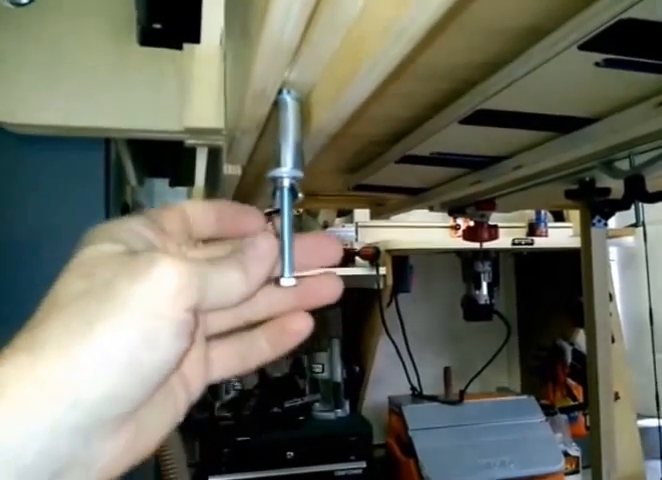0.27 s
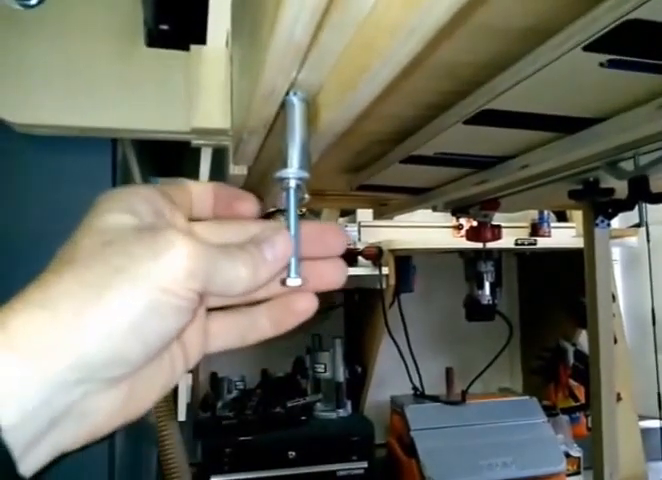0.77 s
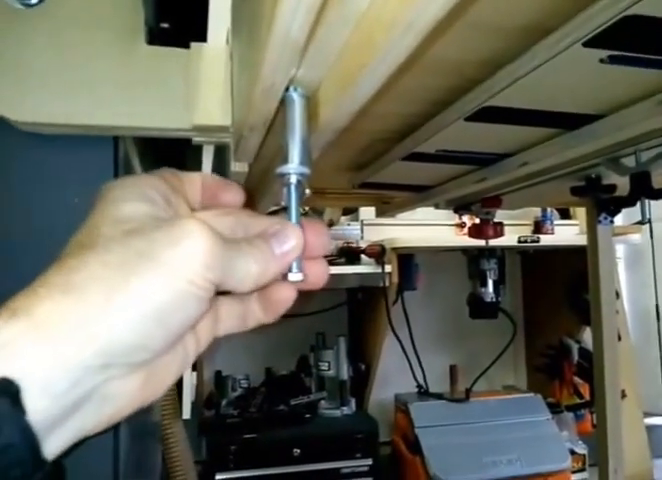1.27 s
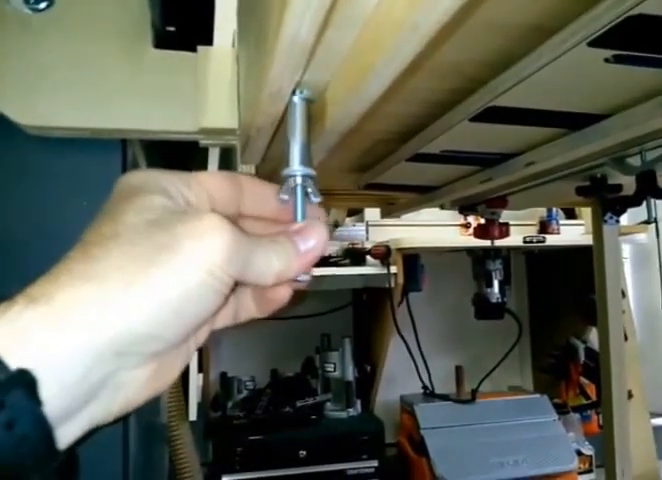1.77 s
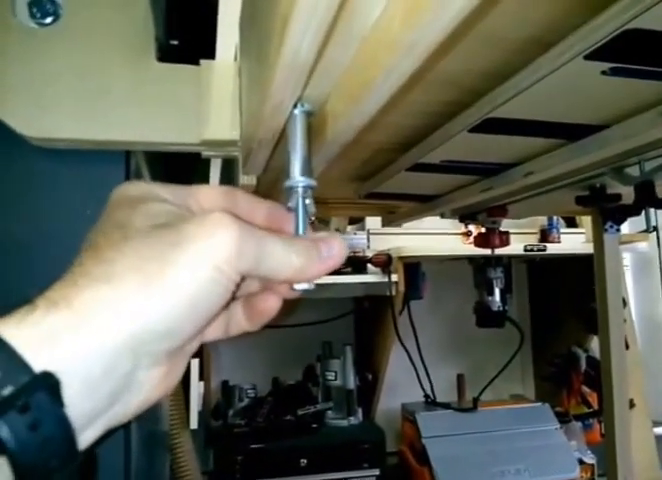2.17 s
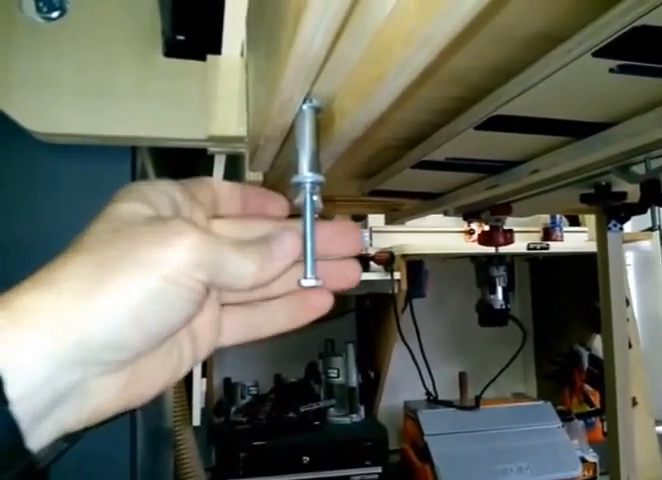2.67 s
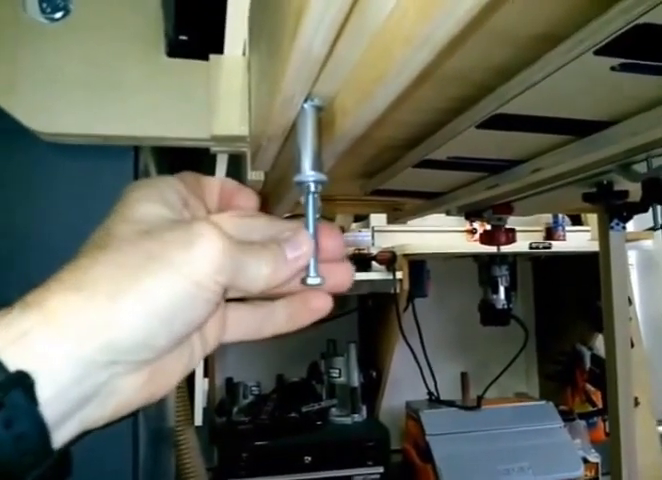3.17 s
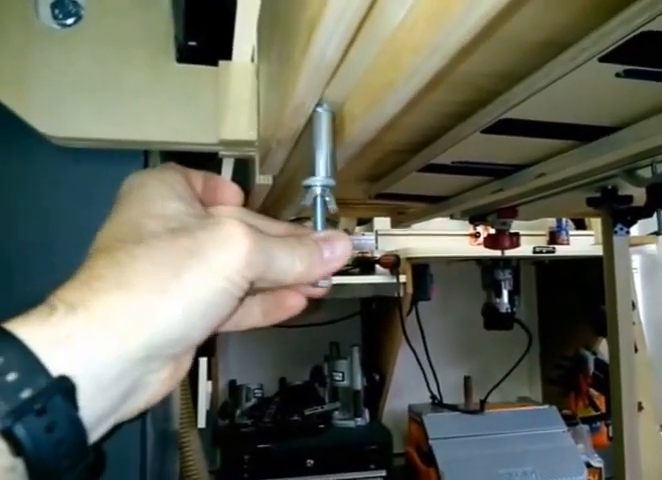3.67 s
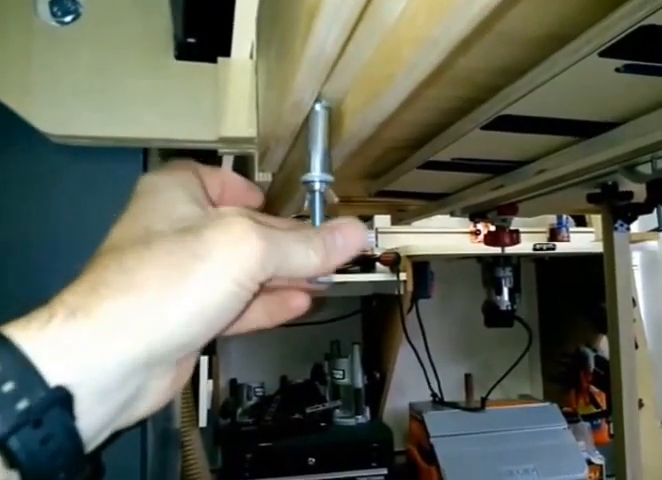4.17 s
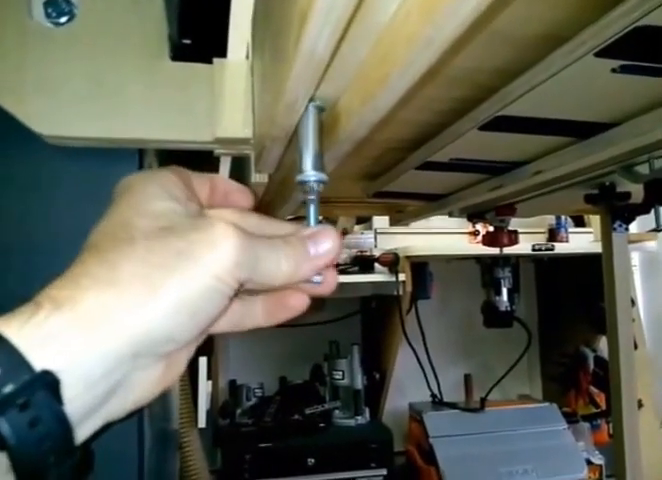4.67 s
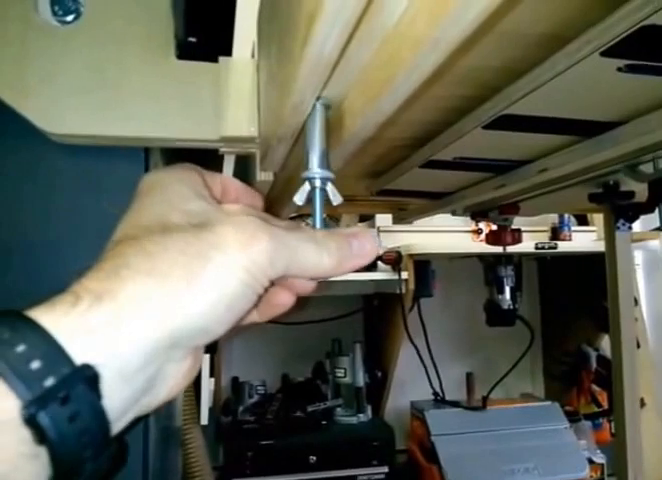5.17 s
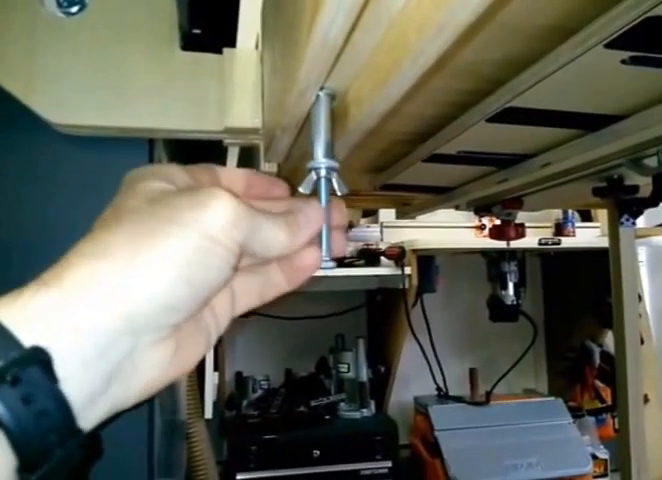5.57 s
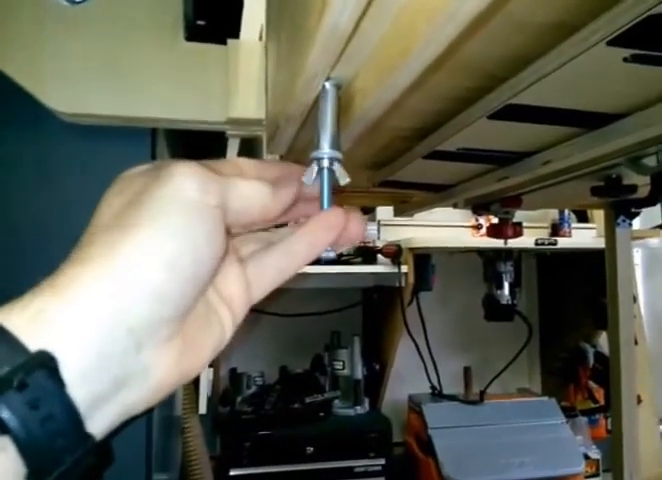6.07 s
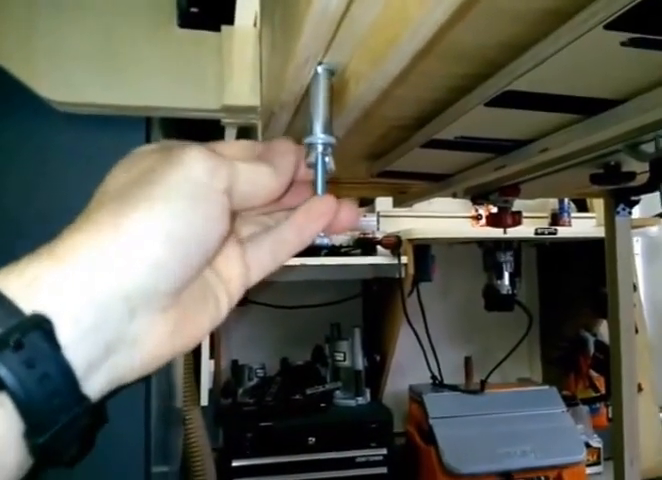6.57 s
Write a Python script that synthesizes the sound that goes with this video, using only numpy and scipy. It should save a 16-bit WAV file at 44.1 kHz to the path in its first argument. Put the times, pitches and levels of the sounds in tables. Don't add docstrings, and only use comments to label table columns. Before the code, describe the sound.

In a humming, rumbling workshop, a fingernail snaps once on a bolt head. After a pause, a hand turns a wing nut in short strokes: gritty thread scrapes, wooden knocks, bright ticks and one tiny squeal. Later strokes are sparser, with soft finger bumps and two sharp clinks. Close phone pickup; a noise gate makes the hum drop out and return.

```python
import sys
import numpy as np
from scipy import signal
from scipy.fft import rfft, irfft
from scipy.io import wavfile
from scipy.ndimage import uniform_filter1d

SR = 44100
rng = np.random.default_rng(int(sys.argv[2]) if len(sys.argv) > 2 else 0)


def field_ratio(decibels):
    return 10 ** (np.asarray(decibels, dtype=float) / 20)


def inscribe(sig):
    pcm = np.round(np.clip(np.atleast_2d(sig).T, -1, 1) * 32767)
    wavfile.write(sys.argv[1], SR, pcm.astype(np.int16))


N = 300321

GATE_OPEN_DB = -68.5
FIRST_TURN_S = 1.43
UPPER_WOOD_HZ = 1350
MODE_SCATTER_DB = 2


def unit(x):
    return x / np.sqrt(np.mean(x ** 2))


def ring(x, hz, width):
    return signal.lfilter(*signal.iirpeak(hz, hz / width, fs=SR), x)


def decay(t, t60):
    return np.exp(-np.log(1000) * t / t60)


def lowpass(x, order, hz):
    return signal.lfilter(*signal.butter(order, hz, fs=SR), x)


def curve(rows):
    s, *columns = np.transpose(rows)
    return [np.interp(np.arange(N) / SR, s, c) for c in columns]


def wander(rate_hz):
    return unit(ring(rng.standard_normal(N), rate_hz, 2.6 * rate_hz))


def above(db, quiet_db):
    return np.sqrt(np.maximum(field_ratio(db) ** 2 - field_ratio(quiet_db) ** 2, 0))


def grit(per_s, spread_db, most=2):
    hit = rng.random(N) < per_s / SR
    size_db = spread_db * np.minimum(rng.exponential(size=N), most)
    return unit(hit * rng.standard_normal(N) * field_ratio(size_db))


def add(out, s, burst, db):
    i = int(s * SR)
    out[i:i + len(burst)] += (field_ratio(db) * burst / np.abs(burst).max())[:N - i]


# frequency in Hz, level in dB per Hz.
AIR = [(35, -29.5), (60, -2), (149, -4.5), (202, -7), (249, -14.5), (280, -12), (563, -22), (604, -8),
       (647, -23), (1130, -24.5), (8030, -33.5), (9460, -31.5), (15800, -30)]
# pitch in Hz, rms level in dB.
HUM = [(119.7, -59.5), (143.3, -56), (172, -62), (239.5, -65), (476, -73), (598.5, -71)]
# centre in Hz, width in Hz, rms level in dB.
HISS = [(5500, 1400, -70), (7200, 200, -76.5), (9410, 190, -73.5)]
# pitch in Hz, rms level in dB.
WHINE = [(9493, -86), (9628, -76), (9767, -84), (9906, -86)]
# time in seconds, level in dB over the open gate level.
RUMBLE = [(0, 17.5), (1.3, 19.5), (1.8, 16), (2.5, 13), (3.2, 16), (4.2, 11.5), (5.1, 14), (5.6, 7),
          (6.81, 8.5)]


def shop():
    hz = np.fft.rfftfreq(N, 1 / SR) + 1
    at, db = np.transpose(AIR)
    colour = field_ratio(np.interp(np.log(hz), np.log(at), db))
    air = unit(irfft(rfft(rng.standard_normal(N)) * colour, N))
    t = np.arange(N) / SR
    lines = [(f, 3.6 + 0.0051 * f, g) for f, g in HUM]
    machines = sum(field_ratio(g) * unit(ring(rng.standard_normal(N), f, w)) for f, w, g in lines + list(HISS))
    machines = machines + sum(field_ratio(g) * np.sqrt(2) * np.sin(2 * np.pi * f * t) for f, g in WHINE)
    rumble_hz, width_hz = 38.3, 16
    deep = unit(ring(ring(rng.standard_normal(N), rumble_hz, width_hz), rumble_hz, 2 * width_hz))
    deep = deep + 0.99 * np.sin(2 * np.pi * 37.7 * t)
    rumble_db, = curve(RUMBLE)
    return field_ratio(-55) * air + machines + field_ratio(rumble_db + GATE_OPEN_DB) * unit(deep)


# start in seconds, hold in seconds,
# thread force in dB, shift of the bolt in the wood in dB, both over the open gate level.
STROKES = [(0.0, 0.021, 0.5, 16.5), (1.451, 0.008, 24, 20.5), (1.518, 0.027, 7, 11),
           (1.698, 0.012, 26.5, 34), (1.801, .008, 19, 18), (1.815, 0.0075, 29, 37),
           (1.859, 0.07, 13.5, 25.5), (1.974, 0.09, 19.5, 23.5), (2.11, 0.056, 12.5, 20),
           (2.46, 0.0079, -6, 13.5), (2.586, 0.013, 13, -5), (2.782, 0.0094, 27, 27.5),
           (2.8, 0.047, 16.5, 16), (3, 0.027, 12.5, 2), (3.13, .008, 16, 13), (3.323, 0.049, 16, 19),
           (3.66, 0.021, 23, 25.5), (3.953, 0.013, 16, 20.5), (4.101, 0.018, 16.5, 24),
           (4.148, 0.05, 12, 19.5), (4.6, 0.54, 7.5, 11), (4.615, 0.032, 14.5, 20.5), (4.81, 0.11, 10, 9.5),
           (4.994, 0.09, 10, 13), (5.028, 0.03, 9, 11), (5.17, 0.12, 5, 12), (5.574, 0.024, 14, 17),
           (5.863, 0.045, 12.5, 20.5), (5.912, 0.022, 5, 19), (6.013, 0.02, 11.5, -8),
           (6.186, 0.016, 5, 16.5), (6.212, 0.086, 10, 14), (6.323, 0.02, 9, 2), (6.763, .06, 9, 18.5)]


def hand(column, fall_db_s, rest_db):
    t = np.arange(N) / SR
    rise_db_s = 1500
    power = field_ratio(rest_db) ** 2 * (t > FIRST_TURN_S) + 1e-9
    for row in STROKES:
        late = t - row[0]
        rise = rise_db_s * np.minimum(late, 0)
        fall = fall_db_s * np.maximum(late - row[1], 0)
        power = power + field_ratio(row[column] + rise - fall) ** 2
    return 10 * np.log10(power)


EDGE_MODE_HZ, EDGE_MODE_T60_S = 2330, .045
# pitch in Hz, level in dB, 60 dB decay in seconds.
TOP_MODES = [(2900, -13, .07), (3010, -12, .07)]
# pitch in Hz, level in dB, 60 dB decay in seconds.
SHELF = [(484, 8, 0.16), (591, 13.2, 0.06), (610, 1, 0.039), (720, 3.1, 0.1), (770, 8.6, 0.12),
         (835, 7.8, 0.18), (1011, 7.3, 0.14), (1150, 7.3, 0.15), (1580, -7, 0.028), (1727, 0, 0.039),
         (1990, 0, 0.071), (EDGE_MODE_HZ, -3, EDGE_MODE_T60_S), *TOP_MODES]


def rub():
    x = lowpass(grit(1800, 1.2), 2, 2800)
    body = field_ratio(-7) * ring(x, 740, 2000)
    for hz, db, t60 in SHELF:
        mode_db = db + 3 * (hz > UPPER_WOOD_HZ) + 4.7 * wander(8.1)
        body = body + field_ratio(mode_db) * ring(x, hz, 5.3 / t60)
    level_db = hand(column=3, fall_db_s=210, rest_db=10)
    return above(level_db, 7.5) * field_ratio(-5.5) * unit(body)


# time in seconds, peak level in dB.
SNAPS = [
    (0.419, -24),
    (0.421, -35),
]
# pitch in Hz, width in Hz, level in dB.
SNAP_RINGS = [(1100, 240, 7.5), (1540, 160, 1), (2600, 250, -5), (3030, 290, -7), (3660, 640, -3),
              (5200, 1400, 3)]


def snaps():
    out, push = np.zeros(N), signal.unit_impulse(400)
    burst = sum(field_ratio(g) * ring(push, f, w) * f / w for f, w, g in SNAP_RINGS)
    for s, peak_db in SNAPS:
        add(out, s, burst, peak_db)
    return lowpass(out, 6, 6700)


# time in seconds, peak level in dB,
# strongest mode in Hz, chatter length in seconds.
SOFT_KNOCKS = [(1.378, -48, 600, 0.0057), (1.454, -43.5, 1036, 0.035), (1.989, -38.5, 766, 0.084),
               (2.152, -36, 720, 0.003), (2.468, -38, 660, 0.0068), (3.173, -41.5, 704, 0.0037),
               (3.677, -39.5, 990, 0.038), (3.984, -48.5, 613, 0.024), (4.028, -41.5, 610, 0.016),
               (4.108, -40, 710, 0.013), (4.216, -42.5, 600, 0.0097), (4.935, -52, 476, 0.007),
               (5.866, -48, 610, 0.017)]
# time in seconds, peak level in dB,
# strongest mode in Hz, chatter length in seconds.
HARD_KNOCKS = [(1.69, -31, 717, 0.01), (1.696, -34.5, 1980, 0.0027), (1.813, -50, 1150, 0.006),
               (1.824, -26, 770, 0.0036), (1.829, -26.5, 2350, 0.0046), (1.8355, -23.5, 1150, 0.0019),
               (1.865, -42.5, 1150, .008), (2.032, -32.5, 1820, 0.0039), (2.148, -35, 1005, 0.002),
               (2.818, -56, 2010, 0.052), (2.892, -50, 1950, 0.012), (3.127, -44, 865, 0.0078),
               (3.344, -47.5, 480, 0.01), (4.112, -44.5, 1150, .005), (4.146, -47, 595, 0.006),
               (4.172, -48, 2950, 0.0051), (4.268, -50, 2000, 0.004), (4.636, -49.5, 2200, 0.017),
               (5.17, -58, 1690, 0.0074), (5.877, -59, 2000, .005), (5.916, -50, 2160, 0.0035),
               (6.259, -48, 1990, 0.0058), (6.747, -54.5, 1870, 0.069)]


def knocks():
    out, t, push_t = np.zeros(N), np.arange(9000)[:, None] / SR, np.arange(3000) / SR
    hz, db, t60 = np.transpose(SHELF)
    damped = decay(t, .65 * t60)
    rows = [(*r, 2.5) for r in HARD_KNOCKS] + [(*r, -28) for r in SOFT_KNOCKS]
    for s, peak_db, top_hz, chatter_s, upper_db in rows:
        upper_db = upper_db + 15 + 39 * (top_hz > UPPER_WOOD_HZ)
        mode_db = db + MODE_SCATTER_DB * rng.standard_normal(len(hz))
        mode_db = mode_db + np.where(hz > UPPER_WOOD_HZ, upper_db, 0)
        mode_db = mode_db + 12 * np.exp(-(np.log(hz / top_hz) / .1) ** 2)
        pitch = hz * (1 + 0.0074 * rng.standard_normal(len(hz)))
        modes = (field_ratio(mode_db) * np.sin(2 * np.pi * pitch * t) * damped).sum(axis=1)
        push = rng.standard_normal(len(push_t))
        push = push * np.abs(push)
        push[60:70] += 4
        push = push * np.exp(-push_t / chatter_s) * np.minimum(push_t / 0.0023, 1)
        add(out, s, signal.fftconvolve(push, modes), peak_db + 4.5)
    return signal.lfilter(*signal.butter(4, 460, "high", fs=SR), out)


# pitch in Hz, width in Hz, level in dB.
THREAD = [(4440, 120, -36), (5110, 260, -8), (6900, 400, -5.5), (8060, 470, -1.5), (8650, 380, 1),
          (9250, 830, -9.5)]
# time in seconds, share of the highest thread ring 0-1.
GRIP = [(0, 0.4), (1.6, 0.93), (2.1, 0.52), (3.3, 0.47), (4.5, 0.37), (4.9, 0), (5.2, 0.5), (5.9, 0.6),
        (6.05, 0.86), (6.81, 0.57)]


def scrape():
    x = grit(6000, 1.3) * field_ratio(2.0 * wander(30))
    share, = curve(GRIP)
    rings = [field_ratio(g) * ring(ring(x, f, w), f, 3 * w) for f, w, g in THREAD]
    high = share * unit(rings[-1]) + (1 - share) * unit(rings[-2] + rings[-3])
    low = unit(sum(rings[:-3]) + field_ratio(-6.0) * ring(x, 6600, 4200))
    scrape_db = hand(column=2, fall_db_s=341.5, rest_db=2)
    crunch_db = hand(column=2, fall_db_s=495.5, rest_db=7) + 0.5
    turning = np.arange(N) / SR > FIRST_TURN_S
    return turning * (above(scrape_db, -0.5) * field_ratio(-3.0) * high + above(crunch_db, 5.5) * field_ratio(-6.0) * low)


# start in seconds,
# length in seconds, ring in Hz, rms level in dB.
DRAGS = [(1.49, 0.07, 9500, -54), (1.455, 0.042, 1060, -54), (1.459, .012, 3020, -54.5),
         (1.832, .045, 1150, -43.5), (1.974, 0.04, 1010, -50.5), (2.81, .07, 616, -51),
         (2.799, .11, 2060, -59), (2.055, .05, 1860, -50), (4.634, .03, 2150, -56),
         (3.171, 0.052, 766, -57), (3.41, .04, 8700, -61.5), (3.468, .025, 8700, -61.5),
         (3.417, .085, 486, -56), (3.45, 0.054, 750, -58), (3.68, 0.055, 850, -47.5),
         (3.69, .035, 8800, -61), (4.1, 0.029, 695, -46), (4.147, 0.027, 532, -48), (4.185, .03, 2750, -60),
         (4.58, 0.064, 482, -55), (4.86, 0.066, 2360, -64), (4.868, 0.05, 1680, -62),
         (4.929, .025, 478, -51), (4.996, 0.077, 764, -56.5), (5.022, .04, 1650, -57.5),
         (5.028, 0.069, 2300, -62), (5.08, .035, 1740, -59.5), (5.168, .03, 765, -58),
         (5.378, .02, 794, -59.5), (5.407, 0.024, 520, -58), (5.887, 0.088, 605, -52),
         (5.868, .03, 1100, -52.5), (5.87, 0.022, 2010, -58.5), (6.194, .04, 1850, -61),
         (6.29, .045, 1760, -64)]


def drags():
    out, x = np.zeros(N), grit(500, 2.5)
    edge_s, fade_db = .006, 5
    for s, length, hz, db in DRAGS:
        i, t = int(s * SR), np.arange(int((length + 2 * edge_s) * SR)) / SR
        width = .13 * hz
        tone = unit(ring(ring(x[i:i + len(t)], hz, width), hz, 2 * width))
        swell = np.clip(np.minimum(t, t[::-1] / 2) / edge_s, 0, 1)
        out[i:i + len(t)] += field_ratio(db + fade_db * (.5 - t / t[-1])) * tone * swell
    return out


# pitch in Hz, width in Hz, level in dB.
NUT = [(2950, 120, -12), (3380, 86, -16.5), (4034, 110, -11.5), (4550, 130, -17), (5010, 120, -11),
       (5520, 99, -22.5), (6000, 96, -10), (6950, 390, 2.5), (7730, 130, -16.5), (8900, 200, 2.5),
       (9500, 150, -6)]
# time in seconds,
# peak level in dB, strongest ring in Hz.
PINGS = [(1.6852, -49, 9700), (1.7045, -41, 8300), (1.708, -36, 5000), (1.7208, -37.5, 6560),
         (1.8355, -42, 6800), (1.8894, -45, 6550), (1.8996, -33, 6550), (1.9672, -32, 6870),
         (1.967, -42, 4050), (1.9984, -40, 9500), (2.0103, -37, 6700), (2.0125, -42, 4050),
         (2.0318, -36, 9900), (2.0808, -38.5, 9100), (2.2323, -45.5, 7250), (2.268, -50.5, 7100),
         (2.787, -60.5, 9360), (2.796, -46.5, 6850), (2.8072, -42, 7050), (2.81, -58, 7000),
         (2.826, -50, 9700), (3.1312, -45.5, 6700), (3.3403, -46.5, 8860), (4.0951, -49, 8700),
         (4.1572, -42, 9600), (4.171, -21.5, 6800), (4.2654, -29.5, 6740), (4.596, -52, 6600),
         (4.611, -54, 6550), (4.631, -45, 6650), (4.7808, -52, 6550), (4.801, -53, 6600),
         (4.984, -52, 8000), (4.997, -50, 8520), (5.024, -34, 6500), (5.0866, -39.5, 6540),
         (5.2072, -56, 5170), (5.2749, -51, 6300), (5.858, -44.5, 6900), (5.912, -45.5, 6900),
         (6.034, -59, 10100), (6.183, -55, 6900), (6.1845, -53, 8900), (6.2614, -24, 6970),
         (6.2794, -36.5, 6900), (6.715, -62, 6950)]
# time in seconds,
# peak level in dB, strongest ring in Hz.
CLACKS = [(1.691, -32.5, 8350), (1.6946, -34, 6000), (1.8085, -38, 2960), (1.815, -41.5, 4410),
          (1.8209, -24.5, 4560), (1.8318, -32, 4560), (1.8634, -46, 9200), (2.0346, -35.5, 5020),
          (2.0371, -32.5, 3630), (2.0378, -33, 3980), (2.8912, -45, 6900), (3.674, -49, 8760),
          (4.596, -60, 5200), (4.6297, -51, 5200), (4.68, -52, 5000), (5.9145, -48, 5500),
          (3.252, -61, 3000)]


def ticks():
    out, t = np.zeros(N), np.arange(3000) / SR
    hz, _, db = np.transpose(NUT)
    crack_band = signal.butter(3, [4600, 9800], "band", fs=SR)
    # low rings in dB, high rings in dB, 60 dB decay in seconds
    rows = [(*r, -3.5, -19, .018) for r in CLACKS] + [(*r, -18, -8, .013) for r in PINGS]
    for s, peak_db, top_hz, low_db, high_db, t60 in rows:
        ring_db = .5 * db + MODE_SCATTER_DB * rng.standard_normal(len(hz))
        ring_db = ring_db + np.where(hz < 4500, low_db + 15.5, 0) + np.where(hz > 7800, high_db + 14.0, 0)
        pitch = hz * (1 + .012 * rng.standard_normal(len(hz)))
        phase = rng.standard_normal(len(hz))
        fade = decay(t, t60)
        burst = (field_ratio(ring_db) * np.sin(2 * np.pi * pitch * t[:, None] + phase)).sum(axis=1) * fade
        burst = burst + field_ratio(11.5) * np.sin(2 * np.pi * top_hz * t) * fade ** 0.99
        noise = rng.standard_normal(len(t))
        crack = signal.lfilter(*crack_band, noise) + field_ratio(.5 * low_db) * ring(noise, 2800, 3000)
        burst = burst + field_ratio(2) * 6 * crack * fade ** 2.7
        add(out, s + .0012, burst * np.minimum(t / .0005, 1), peak_db + 7.0)
    return out


# time in seconds,
# peak level in dB, ring in Hz, 60 dB decay in seconds.
CHIMES = [(1.703, -31, 10100, 0.018), (1.7075, -32, 9500, .025), (1.7095, -43, 6700, .015),
          (1.7215, -42, 9300, .02), (1.8135, -41, 4700, .012), (1.8225, -35, 8700, .02),
          (1.8255, -31, 4200, .015), (1.833, -35, 8800, .025), (1.854, -47, 9700, .04),
          (1.8905, -40, 6580, .02), (2.0355, -29, 1740, 0.035), (2.041, -32.5, 1900, .04),
          (2.149, -38, 890, .03), (2.155, -35.5, 620, 0.054), (2.15, -46.5, 2990, .02),
          (2.051, -34, 2100, .015), (2.081, -44, 5200, .015), (2.8085, -44, 5050, .045),
          (2.8072, -43, 9500, .02), (2.814, -44, 9550, .025), (2.82, -43, 7000, .04),
          (2.893, -45, 4030, .03), (2.896, -55, 1950, .04), (4.1142, -44, 1680, .025),
          (4.1735, -38, 2890, .025), (4.174, -47, 2150, .025), (4.174, -48, 1500, .02),
          (6.259, -47, 3090, .025), (6.262, -43, 2300, .025), (5.916, -51, 3300, .02),
          (5.869, -42, 640, 0.065), (3.375, -51, 3000, .015), (4.176, -47, 4300, .02),
          (4.268, -44.5, 4000, .02), (4.272, -44, 1660, 0.027), (4.598, -50, 4050, .025),
          (4.613, -49, 4070, .04), (4.627, -47, 4150, .03), (4.631, -44, 4030, .025),
          (4.626, -47, 8800, .02), (4.6805, -51, 5370, .015), (5.025, -46, 4030, .02),
          (5.088, -48, 5100, .02), (5.207, -53, 5200, .025)]


def chimes():
    out, t = np.zeros(N), np.arange(3000) / SR
    for s, peak_db, hz, t60 in CHIMES:
        pair = np.sin(2 * np.pi * hz * t) + .5 * np.sin(2 * np.pi * hz * 1.02 * t)
        add(out, s, pair * decay(t, t60) * np.minimum(t / .0015, 1), peak_db)
    return out


# time in seconds, pitch in Hz, level in dB.
SQUEAL = [
    (2.048, 2200, -46),
    (2.054, 2280, -40),
    (2.065, 2305, -33),
    (2.073, 2300, -41),
    (2.097, 2290, -47),
    (2.106, 2285, -57),
    (2.15, 2282, -53),
    (2.162, 2282, -59),
    (2.275, 2275, -60),
]
# time in seconds, pitch in Hz, level in dB.
PEEP = [
    (2.243, 4380, -68),
    (2.252, 4420, -62),
    (2.268, 4390, -66),
]
# multiple of the pitch, level in dB at full force.
SQUEAL_OVERTONES = [(2, -6.5), (3, -8)]


def squeal(rows):
    start = (rows[0][0] - .004, rows[0][1], -110)
    end = (rows[-1][0] + 0.017, rows[-1][1], -110)
    hz, db = curve([start, *rows, end])
    force, unrest = field_ratio(db - SQUEAL[2][2]), wander(45)
    wobble = .002 * (1 - force) * unrest[::-1]
    phase = 2 * np.pi * np.cumsum(hz * (1 + wobble)) / SR
    wave = np.sin(phase) + sum(field_ratio(g) * force ** 2.2 * np.sin(k * phase) for k, g in SQUEAL_OVERTONES)
    return np.sqrt(2) * field_ratio(db + 2.5 * (1 - force) * unrest) * wave


# time in seconds, peak level in dB, pitch in Hz,
# 60 dB decay in seconds.
THUMPS = [
    (2.848, -37, 102, 0.15),
    (3.352, -28, 306, 0.018),
    (3.483, -35.5, 115, 0.067),
    (4.627, -52, 101, 0.044),
    (4.632, -31.5, 159, 0.077),
]


def thumps():
    out, t = np.zeros(N), np.arange(4000) / SR
    for s, peak_db, hz, t60 in THUMPS:
        burst = np.sin(2 * np.pi * hz * t) * decay(t, t60) * np.minimum(t / 0.0011, 1)
        add(out, s, burst, peak_db - 2.5)
    return out


def room(x):
    t = np.arange(SR // 2) / SR
    tail = rng.standard_normal(len(t)) * decay(t, 0.35) * np.minimum(t / 0.0075, 1)
    tail = lowpass(tail, 2, 3360)
    return field_ratio(-15.5) * signal.fftconvolve(x, tail / np.sqrt(np.sum(tail ** 2)))[:N]


# time in seconds, gain in dB.
GATE_LEAN = [(0, 5), (.41, 2), (.52, -0.6), (.7, 2), (1.5, 1.8), (2.9, 2), (3.0, 0.8), (3.6, 1), (3.75, 2),
             (3.92, 3.5), (4.45, -0.1), (4.6, 2.5), (4.78, -0.2), (5.05, 3), (5.25, -3), (5.6, -0.6),
             (5.9, 0.5), (6.81, 2.5)]
# start in seconds, end in seconds, gain in dB.
GATE_SHUTS = [(.435, .5, -7), (.578, .635, -13.5), (1.205, 1.285, -14), (2.305, 2.435, -24),
              (2.617, 2.806, -9), (2.68, 2.8, -16.5), (2.74, 2.772, -13.5), (3.258, 3.336, -15),
              (3.51, 3.672, -11.5), (3.895, 3.968, -23), (4.345, 4.4, -4.5), (5.296, 5.346, -7.5),
              (5.532, 5.59, -13), (5.662, 5.86, -14.5), (5.703, 5.774, -11.5), (6.132, 6.194, -24),
              (6.34, 6.399, -13.5), (6.48, 6.731, -8), (6.508, 6.731, -14.5)]
# time in seconds, gain in dB.
GATE_FLINCHES = [(0.48, -8.5), (1.235, 7.5), (1.273, 8), (3.871, -7.5), (4.026, -0.5), (6.486, -13.5),
                 (0.779, -10.5), (1.138, -11), (1.604, -13.5), (2.421, 8), (2.556, -9), (2.611, -8),
                 (2.965, -3.5), (3.059, -9.5), (3.24, -5), (3.302, -10), (3.589, 6.5), (4.503, -16.5),
                 (4.973, -7.5), (5.23, -8.5), (5.997, -6), (6.096, -15.5), (6.452, -15.5), (6.523, -5),
                 (6.689, -10.5), (6.72, 6)]


def gate():
    frame_s, first_s, slew_s, flinch_s = .01, .007, 0.021, 0.024
    frame = np.floor((np.arange(N) / SR - first_s) / frame_s).astype(int) + 1
    t = (np.arange(frame[-1] + 1) - .5) * frame_s + first_s
    flinches = [(s - flinch_s / 2, s + flinch_s / 2, g) for s, g in GATE_FLINCHES]
    db = np.interp(t, *np.transpose(GATE_LEAN))
    for start, end, change_db in list(GATE_SHUTS) + flinches:
        begun = np.clip((t - start) / slew_s + .5, 0, 1)
        ended = np.clip((t - end) / slew_s + .5, 0, 1)
        db = db + change_db * (begun - ended)
    db = db + 1.23 * (1 - db / 15) * rng.standard_normal(len(t))
    return uniform_filter1d(field_ratio(db)[frame], size=90)


GATE = gate()


def scene():
    sliding = field_ratio(GATE_OPEN_DB) * (rub() + scrape())
    hits = snaps() + knocks() + ticks() + chimes() + squeal(SQUEAL) + squeal(PEEP) + thumps()
    near = hits / GATE + sliding + room(hits + sliding) + drags() / GATE
    near = signal.sosfilt(signal.butter(4, 10480, fs=SR, output="sos"), near)
    return (near + shop())[None]


def roll_off(x):
    return signal.sosfilt(signal.butter(12, 15830, fs=SR, output="sos"), x)


def record(dry):
    dry = signal.sosfilt(signal.ellip(10, .2, 70, 15750, fs=SR, output="sos"), dry)
    return roll_off(dry * GATE)


dry = scene()
out = record(dry)
inscribe(out)
```